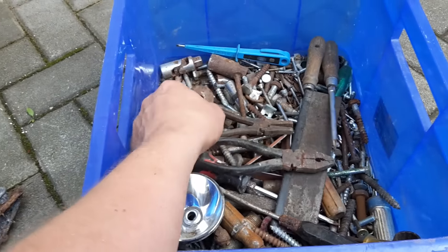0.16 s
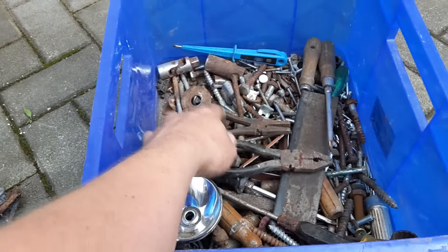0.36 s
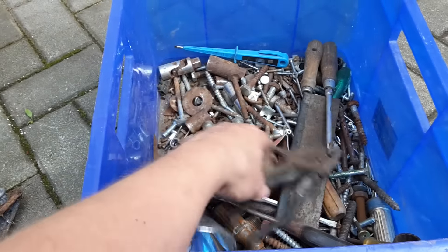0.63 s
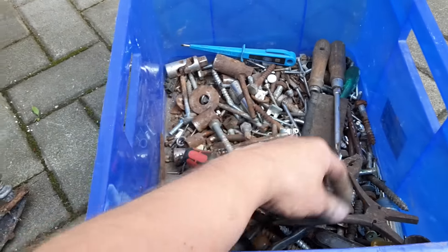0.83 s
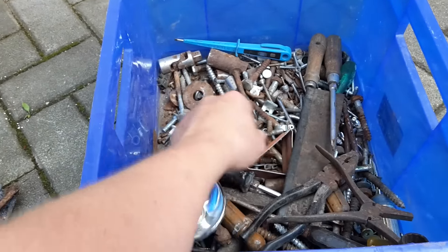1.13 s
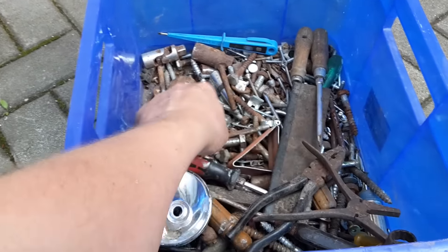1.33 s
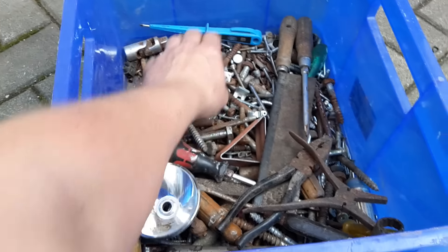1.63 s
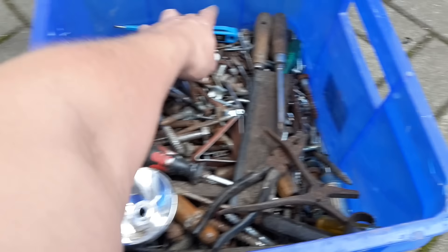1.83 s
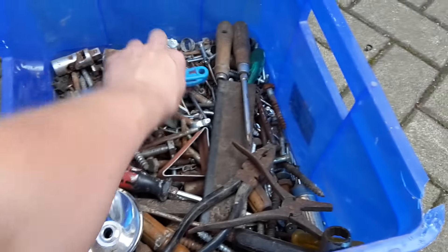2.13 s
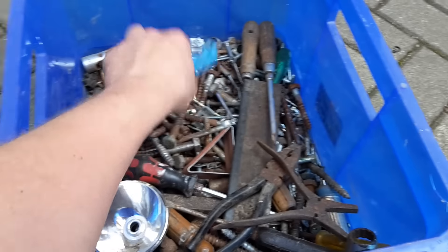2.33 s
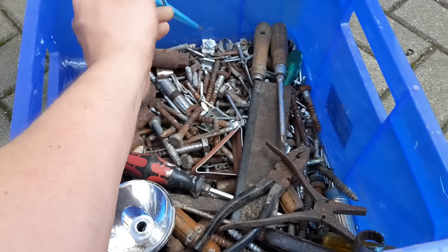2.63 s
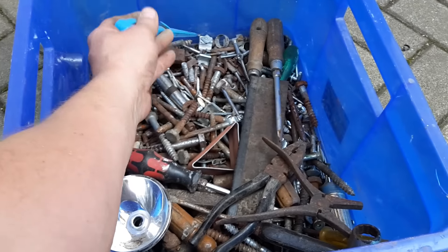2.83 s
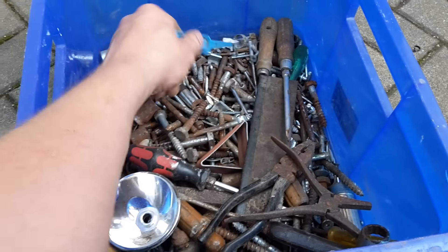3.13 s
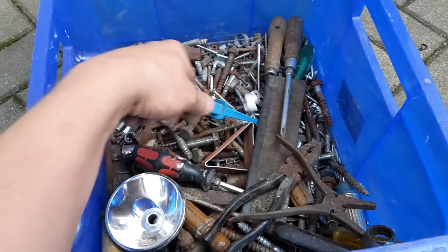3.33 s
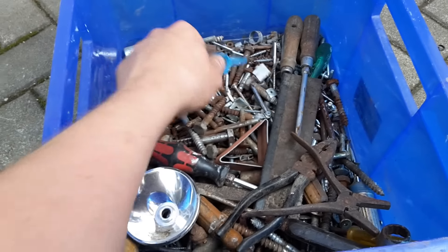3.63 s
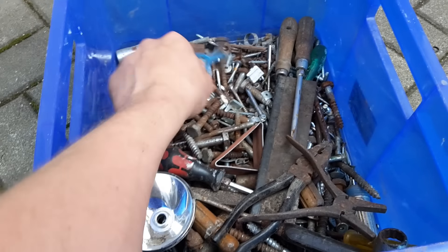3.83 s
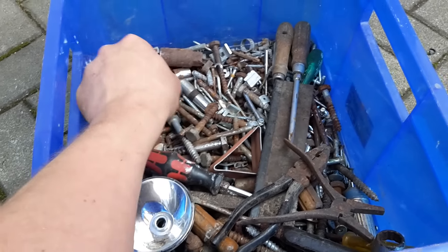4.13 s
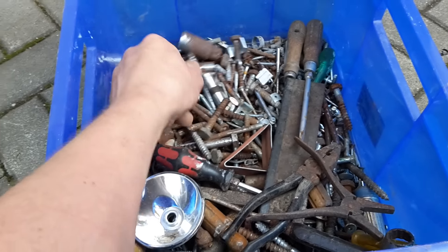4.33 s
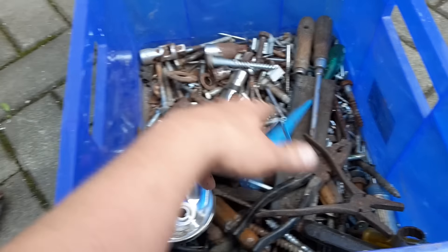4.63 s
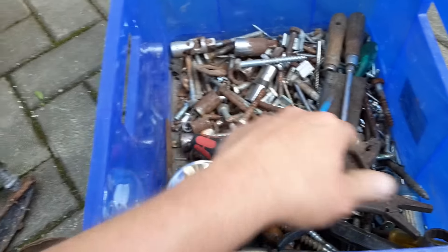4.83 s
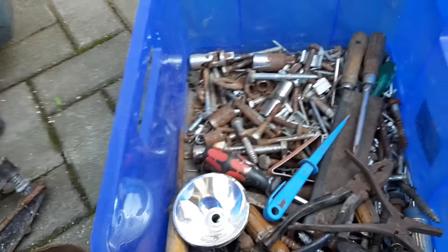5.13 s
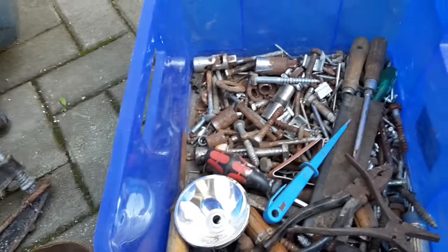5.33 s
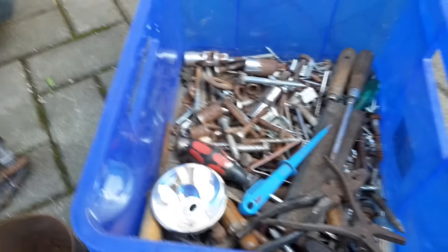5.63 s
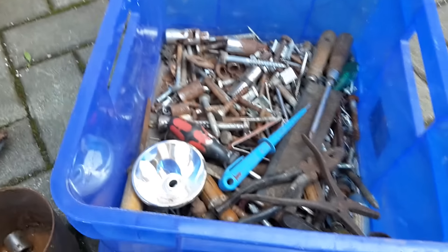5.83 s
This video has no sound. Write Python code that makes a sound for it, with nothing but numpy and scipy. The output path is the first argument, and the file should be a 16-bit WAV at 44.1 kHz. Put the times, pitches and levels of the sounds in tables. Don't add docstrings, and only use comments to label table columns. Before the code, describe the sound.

A close, bright stereo pickup over a plastic crate of steel screws and hand tools in a paved yard. A low rumble and faint hum sit far behind, swelling and fading slightly. From 0.15 s pliers clink, with a short scrape at 0.2; clanks and wooden knocks crowd 0.55-1.05, peaking in a hard, dull thud near 0.87. Small bounces fade after 1.1, leaving near quiet with a tiny tick at 1.45. A low thump at 1.9 leads into dense, glittering raking of screws at 2.05-2.45 and a clink at 2.54. Soft thuds come at 2.9, light clinks at 3.2, then another sharp jingling burst at 3.33-3.57. Separate clinks follow, strongest at 4.0. From 4.35 screws rattle again, with a clack at 4.7; a plastic pick drops at 4.82 and bounces at 4.92. After 5.1 only faint ticks, hum and thin, distant bird whistles remain.

```python
import sys
import numpy as np
from scipy import signal
from scipy.fft import rfft, irfft, next_fast_len
from scipy.io import wavfile
from scipy.ndimage import uniform_filter1d

SR = 44100
rng = np.random.default_rng(int(sys.argv[2]) if len(sys.argv) > 2 else 0)


def int16_out(signal):
    q = np.round(np.clip(np.atleast_2d(signal).T, -1, 1) * 32767)
    wavfile.write(sys.argv[1], SR, q.astype(np.int16))


def voltage_ratio(level):
    return 10 ** (np.asarray(level, float) / 20)


N = 263277


def evened(x):
    return x / np.sqrt(np.mean(x ** 2) + 1e-20)


def read(points, hz):
    f, value = np.transpose(points)
    return np.interp(np.log(hz + 1), np.log(f + 1), value)


def curve(rows):
    s, *columns = np.transpose(rows)
    return [np.interp(np.arange(N) / SR, s, column) for column in columns]


def drift(*sizes):
    x = rng.standard_normal(N)
    for size in sizes:
        x = uniform_filter1d(x, size=size)
    return evened(x)


def add(mix, s, sound):
    part = mix[:, round(s * SR):][:, :sound.shape[1]]
    part += sound[:, :part.shape[1]]


def highpass(x, order, hz):
    return signal.sosfilt(signal.butter(order, hz, "high", fs=SR, output="sos"), x)


def colour(x, spectrum):
    hz = abs(np.fft.fftfreq(4096, 1 / SR))
    log_gain = np.log(voltage_ratio(np.maximum(read(spectrum, hz), -90)))
    taps = np.fft.ifft(np.exp(np.conj(signal.hilbert(log_gain)))).real[:2048]
    return signal.oaconvolve(x, taps[None] / np.linalg.norm(taps), axes=1)[:, :N]


# (frequency [Hz], likeness [0-1])
LIKENESS = [(60, 0.89), (300, 0.93), (640, .7), (1400, 0.32), (15000, 0.022)]
# (frequency [Hz], left over right [dB])
BALANCE = [(60, -2), (400, -1.5), (1500, -6), (8000, -9.5), (14000, -0.5)]


def ports(x):
    size = next_fast_len(N)
    hz, z = np.fft.rfftfreq(size, 1 / SR), rfft(x, size)
    same = np.clip(read(LIKENESS, hz), 0, 1)
    lean = voltage_ratio(read(BALANCE, hz) / 2)
    left = lean * z[0]
    right = (same * z[0] + np.sqrt(1 - same ** 2) * z[1]) / lean
    return irfft([left, right], size)[:, :N]


def modes(hz, db, t60, pan_db, turn, rise=0.0012):
    t = np.arange(int(SR * np.clip(np.max(t60), .01, .8))) / SR
    columns = (hz, db, np.maximum(t60, .01), pan_db, turn)
    hz, db, t60, pan_db, turn = (np.reshape(v, (-1, 1)) for v in columns)
    size = voltage_ratio(db - 60 * t / t60) * (1 - np.exp(-t / rise))
    sides = []
    for side in (1, -1):
        sine = np.sin(2 * np.pi * hz * t + side * turn / 2)
        sides.append((size * voltage_ratio(side * pan_db / 2) * sine).sum(0))
    return np.array(sides)


def burst(db, t60):
    t = np.arange(4000) / SR
    rise = 1 - np.exp(-t / .0006)
    return voltage_ratio(db - 60 * t / max(t60, .005)) * rise * rng.standard_normal((2, 4000))


def patchy(x, depth_db):
    z = signal.stft(x, nperseg=256, noverlap=192)[2]
    spots = uniform_filter1d(rng.standard_normal(z.shape[1:]), size=2, axis=0)
    spots = uniform_filter1d(spots, size=14, axis=1)
    gain = voltage_ratio(depth_db * evened(spots))
    return signal.istft(z * evened(gain), nperseg=256, noverlap=192)[1][:, :N]


def whistle(hz, width):
    r = np.exp(-np.pi * width / SR)
    slow = signal.lfilter([1], [1, -r], rng.standard_normal(N) + 1j * rng.standard_normal(N))
    phase = 2 * np.pi * np.cumsum(hz * np.ones(N)) / SR
    return evened(((3.3 + slow / np.std(slow)) * np.exp(1j * phase)).real)


# (time [s], level [dB])
YARD_LEVEL_DB = [(0, -63), (0.3, -50.5), (0.5, -53), (1.2, -49.5), (1.88, -45), (2.0, -30.5), (2.1, -37),
                 (2.5, -47), (3.55, -52), (3.72, -57.5), (3.95, -48), (4.1, -45), (4.22, -65),
                 (4.32, -59.5), (4.55, -37), (5.05, -47.5), (5.6, -47.5), (5.97, -42)]
# (frequency [Hz], density [dB per Hz])
YARD_SPECTRUM = [(35, -6.5), (150, -7), (300, -10), (650, -20.5), (1750, -41), (3500, -64.5), (8300, -69.5),
                 (16500, -75)]
# (frequency [Hz], width [Hz], level over the yard [dB])
HUM_LINES = [(215.3, 7.1, -3), (194.6, 9, -10), (119, 26, -15), (660, 13, -21.5), (1082, 9, -23)]


def yard():
    level_db = curve(YARD_LEVEL_DB)[0] - 9.5
    rumble = evened(ports(colour(rng.standard_normal((2, N)), YARD_SPECTRUM)))
    deep = signal.sosfiltfilt(signal.butter(2, 110, fs=SR, output="sos"), rumble)
    hum = sum(voltage_ratio(db) * whistle(hz, width) for hz, width, db in HUM_LINES)
    steady = deep + hum * voltage_ratio([[-.6], [.6]])
    return voltage_ratio(level_db) * (rumble - deep) + voltage_ratio(np.minimum(level_db, -54)) * steady


# (time [s], frequency [Hz], level [dB])
BIRD_WHISTLES = [
    [(5.1, 5900, -81), (5.26, 6240, -77), (5.35, 6580, -103.5), (5.5, 6300, -81), (5.66, 5980, -87)],
    [(5.07, 5340, -99), (5.3, 5370, -90), (5.6, 5030, -88)],
    [(5.78, 4880, -96), (5.84, 4520, -96), (5.96, 4550, -87)],
]


def birds():
    out, t = np.zeros(N), np.arange(N) / SR
    for rows in BIRD_WHISTLES:
        hz, db = curve(rows)
        db = db + 4 * drift(1500) - 3
        warble_hz = 110 * drift(900, 900)
        sounding = (t > rows[0][0]) * (t < rows[-1][0])
        out += voltage_ratio(db) * whistle(hz + warble_hz, 90) * sounding
    return out * voltage_ratio([[-4.5], [-1.5]])


# (frequency [Hz], density [dB per Hz])
CRATE_SPECTRUM = [(60, -46), (250, 5), (600, -7), (1200, 2.5), (2500, -8), (3700, -31), (6000, -45)]


def blows(rows, others, turn, puff_db, pan_db, rise, dull_db):
    tones, puffs = np.zeros((2, N)), np.zeros((2, N))
    rank = np.arange(len(others) + 1) > 0
    for (s, db, hz, t60), luck in zip(rows, rng.uniform(-1.5, 1, (len(rows), 3, len(rank)))):
        near = hz * np.r_[1, others] * (1 + 0.052 * rank * luck[0])
        dulling = dull_db * np.maximum(np.log2(near / hz), 0)
        level = db + 5.5 - 7 * rank + 3 * luck[1] * rank - dulling
        add(tones, s, modes(near, level, t60 * (1 - 0.26 * rank), pan_db + 0 * near, turn * luck[2], rise))
        add(puffs, s, burst(db + puff_db, 2.0 * t60))
    return tones + ports(colour(puffs, CRATE_SPECTRUM))


# (time [s], peak level [dB], frequency [Hz], t60 [s])
FLOOR_THUDS = [(0.142, -33.5, 233, .07), (0.17, -33, 253, .07), (0.627, -42, 263, .07),
               (0.865, -16.5, 440, .035), (.874, -24, 520, .05), (.896, -31, 400, .04),
               (1.909, -23.5, 182.6, .06), (1.909, -44, 554, .2), (1.986, -33.5, 288, .07),
               (2.023, -26.5, 280, .07), (2.146, -34.5, 292, .07), (2.31, -30.5, 303, .07),
               (2.899, -31, 285, .1), (2.933, -30.5, 275, .05), (2.95, -40, 290, .05),
               (3.189, -33.5, 239, .07), (3.962, -37, 230, .07), (3.973, -29, 260, .09),
               (4.06, -42, 250, .12), (4.425, -42, 362, .07), (4.49, -36, 285, .07), (4.507, -25, 214, .05),
               (4.542, -33, 300, .15), (4.725, -22.5, 301, .03), (4.794, -36.5, 275, .07)]


def thuds():
    late = [(s + 0.0021, *rest) for s, *rest in FLOOR_THUDS]
    out = blows(late, others=[.55, .8, 1.3, 1.9], turn=0.34, puff_db=-25.5, pan_db=-2.0,
                rise=0.0022, dull_db=8)
    return highpass(out, 2, 110)


# (frequency [Hz], density [dB per Hz])
STEEL_SPECTRUM = [(3000, -11.5), (3690, -32), (4260, -23), (7110, -44), (9660, 4), (12100, 1),
                  (15300, -9.5), (16500, -28.5)]
# (frequency [Hz], density [dB per Hz])
PLIERS_SPECTRUM = [(2500, -14), (3500, -2.5), (5100, -6.5), (6000, 3.5), (8000, 4.5), (9500, -27.5)]


def grains(per_s, size_db, tail_s, busy):
    ticks = (rng.random(N) < per_s / SR) * voltage_ratio(size_db * np.minimum(rng.exponential(1, N), 3))
    keep = np.exp(-1 / (tail_s * SR))
    contacts = evened(signal.lfilter([1], [1, -keep], ticks))
    level = (1 + busy * contacts) / np.sqrt(1 + busy + busy ** 2)
    return level * rng.standard_normal((2, N))


def jingle(busy):
    out = np.zeros((2, N))
    for s, size, *luck in rng.random((2000, 11)):
        if busy[int(s * N)] > 0:
            f, pan, turn = np.reshape(luck, (3, 3))
            hz = 3000 + 12800 * f
            db = 0.47 * read(STEEL_SPECTRUM, hz) + 14 * size
            add(out, s * N / SR, modes(hz, db, .012 + .07 * turn ** 2, 14 * pan - 9, 2 * np.pi * turn))
    return out / np.sqrt(np.mean(out[:, busy > 0] ** 2))


# (start [s], end [s], screws at start [dB], screws at end [dB], crate wall [dB])
HAND_STROKES = [(0.173, 0.247, -37.5, -36.5, -51), (0.559, 0.817, -53.5, -48.5, -56.5),
                (0.8, 0.912, -51.5, -37, -50), (0.978, 1.065, -49, -59, -61.5),
                (1.987, 2.048, -59, -59.5, -60), (2.119, 2.408, -38, -32.5, -48),
                (2.716, 2.773, -59.5, -60, -86), (3.203, 3.328, -61, -52, -62),
                (3.327, 3.479, -34, -36.5, -60), (3.876, 4.002, -55, -42, -54),
                (4.359, 4.51, -52.5, -51.5, -56), (4.515, 4.563, -38, -34, -42.5),
                (4.612, 4.96, -48.5, -51.5, -56.5), (5.0, 5.722, -61.5, -70.5, -83),
                (5.84, 5.99, -72, -55, -78)]
RISE_DB_PER_S, SCREWS_FALL_DB_PER_S, WALL_FALL_DB_PER_S = 1397, 331.5, 151.5
REST_SCREWS_DB, REST_WALL_DB, REST_FOLLOW = -80.5, -85.5, 2.4


def heap_levels():
    t = np.arange(N) / SR
    rest = np.minimum(curve(YARD_LEVEL_DB)[0] + 57, 0)
    screws, wall = REST_SCREWS_DB + REST_FOLLOW * rest, REST_WALL_DB + rest
    for start, end, first_db, last_db, wall_db in HAND_STROKES:
        before = RISE_DB_PER_S * np.maximum(start - t, 0)
        after = np.maximum(t - end, 0)
        stroke = np.interp(t, [start, end], [first_db, last_db])
        screws = np.maximum(screws, stroke - before - SCREWS_FALL_DB_PER_S * after)
        wall = np.maximum(wall, wall_db - before - WALL_FALL_DB_PER_S * after)
    return screws, wall


def stir():
    screws_db, wall_db = heap_levels()
    busy = np.clip((screws_db + 62) / 12, 0, 1.5)
    screw_grains = patchy(grains(300, 4.5, .002, busy), depth_db=4) / np.sqrt(1 + busy)
    wall_grains = grains(260, 4.0, .003, .2 + busy)
    heavy = .06 * busy * colour(screw_grains[::-1], PLIERS_SPECTRUM)
    screws = ports(colour(screw_grains, STEEL_SPECTRUM) + heavy)
    screws = screws + .6 * np.minimum(busy, 1) * jingle(busy)
    screws_db = screws_db + 3 * drift(1500, 1500)
    wall = ports(colour(wall_grains, CRATE_SPECTRUM))
    return voltage_ratio(screws_db + 0.5) * screws + voltage_ratio(wall_db + 5.0) * wall


def struck(tables, main_hz, spread):
    rows = [(*row, hz) for table, hz in zip(tables, main_hz) for row in table]
    luck = rng.uniform(-1.6, 1, len(rows))
    return [(*row[:-1], row[-1] * (1 + spread * u)) for row, u in zip(rows, luck)]


# (time [s], peak level [dB])
WALL_KNOCKS = [(.634, -31), (.823, -31.5), (.851, -35), (.927, -31), (1.438, -56), (2.936, -38),
               (4.69, -38), (.981, -36.5), (1.008, -28), (1.143, -39.5), (1.183, -47), (1.274, -46.5),
               (1.566, -51.5), (1.704, -52), (1.817, -50.5), (2.903, -38.5), (3.19, -36.5), (3.331, -32.5),
               (3.909, -39), (4.378, -35.5), (4.759, -30), (5.077, -38.5), (5.159, -41.5), (3.212, -37)]
THICK_HANDLE_KNOCKS = [(0.864, -25), (.9495, -25), (1.0255, -24), (1.0475, -30), (1.111, -35), (2.157, -32)]
HANDLE_KNOCKS = [(0.149, -42), (.168, -29.5), (0.248, -35), (.619, -32), (.657, -33.5), (.716, -29.5),
                 (2.054, -25.5), (2.094, -31.5), (2.544, -42.5), (2.937, -36.5), (3.646, -38), (3.998, -43),
                 (4.549, -28), (4.822, -25), (4.918, -29.5)]
THIN_HANDLE_KNOCKS = [(.595, -35.5), (.8675, -20), (4.535, -33), (.758, -26.5), (1.454, -45.5)]
GRIP_KNOCKS = [(0.554, -40.5), (.869, -24), (0.884, -25), (3.39, -33), (3.41, -34), (2.545, -38),
               (.901, -31), (2.287, -27), (3.373, -32.5), (3.438, -30), (3.876, -43), (4.69, -37.5)]


def knocks():
    tables = [WALL_KNOCKS, THICK_HANDLE_KNOCKS, HANDLE_KNOCKS, THIN_HANDLE_KNOCKS, GRIP_KNOCKS]
    rows = struck(tables, main_hz=[1047, 1175, 1360, 1430, 2080], spread=0.075)
    t60_s = .019
    return blows([(*row, t60_s) for row in rows], others=[.7, .85, 1.2, 1.45, 1.8], turn=1.74,
                 puff_db=-8.5, pan_db=-5, rise=0.0012, dull_db=4)


# (time [s], level [dB])
PICK_BOUNCES = [
    (4.821, -26),
    (4.867, -36),
    (4.919, -28),
    (4.974, -40.5),
    (5.077, -51),
    (5.096, -50),
]
# (frequency [Hz], level [dB], t60 [s])
PICK_BODY = [(1450, -4, 0.04), (2040, -7, .03), (3400, -8, .025), (2400, -4, .04), (2870, -1, 0.05),
             (3970, -7, 0.016), (4635, -5, 0.033)]


def pick():
    out, (hz, mode_db, t60) = np.zeros((2, N)), np.transpose(PICK_BODY)
    for (s, db), luck in zip(PICK_BOUNCES, rng.uniform(-1, 1, (len(PICK_BOUNCES), len(hz)))):
        spot = luck[::-1]
        level = db + mode_db + 5 * luck
        add(out, s, modes(hz * (1 + .035 * spot), level, .55 * t60, -7 + 0 * hz, 1.5 * spot))
    return out


# (time [s], level [dB],
# frequency [Hz], t60 [s], left over right [dB])
SINGLE_RINGS = [(0.147, -42, 10980, 0.2, 0), (0.171, -40, 11010, 0.3, -3), (.708, -42, 10920, .2, -3),
                (.852, -32, 10950, .1, -5), (.884, -34, 10200, .11, -5), (.87, -40, 9738, .4, -8),
                (.953, -32, 11580, .1, 0), (.952, -38, 8376, .05, -8), (.884, -39, 3047, .12, -6),
                (.866, -31, 2750, .025, -6), (.868, -33, 3400, .025, -4), (.899, -39, 2650, .05, -7),
                (1.457, -80, 4996, .2, -6), (1.457, -68, 8140, .2, -8), (1.457, -66, 6794, .07, -6),
                (0.231, -30.5, 9670.0, 0.075, -20.5), (0.554, -50, 11020, 0.22, -11),
                (0.885, -44.5, 7430, 0.13, -19), (1.458, -58.5, 12700, 0.11, -2),
                (1.456, -64, 14770, 0.32, -17), (2.143, -22, 10980, 0.12, -8), (2.215, -28, 13100, 0.07, 5),
                (2.268, -27, 10980, .12, -3), (2.28, -39, 4318, 0.21, 5.5), (2.384, -43, 14740, 0.35, -9),
                (2.445, -55, 4950, 0.1, -9.5), (3.329, -36, 12860, 0.2, 8), (3.438, -34, 12520, 0.19, 12),
                (3.565, -61.5, 8530, 0.46, -11), (3.623, -50, 12250, 0.09, 7),
                (3.995, -45, 8134, 0.16, -16.5), (4.005, -42, 15150.0, 0.25, 0.5), (4.08, -53, 12260, .2, 0),
                (3.79, -60, 8530, .1, -11), (4.8, -48, 8330, .07, -9), (4.328, -52, 13320, 0.2, 0),
                (4.356, -50, 13320, 0.14, 5), (4.363, -59, 5300, .55, -11), (4.365, -62, 5390, .4, -8),
                (4.622, -56.5, 2750, 0.47, -7), (4.619, -42.5, 8300, 0.28, -17.5),
                (4.919, -33.5, 11200, 0.2, -1)]


def rings():
    out = np.zeros((2, N))
    for (s, db, hz, t60, pan), turn in zip(SINGLE_RINGS, rng.uniform(0.4, 0.7, len(SINGLE_RINGS))):
        add(out, s, modes(hz, db + 2.0, t60, pan, turn, rise=0.00078))
    return out


# (time [s], level [dB], t60 [s], main mode [Hz], left over right [dB])
PLIERS_CLINKS = [(0.1454, -38.0, 0.14, 11010, 0.2), (0.17, -25.0, 0.1, 11010, -3.8),
                 (0.179, -27, 0.03, 11010, -3), (0.2034, -27.5, 0.037, 10970, -3.1),
                 (0.2337, -25.5, 0.01, 9670, -14.1), (0.2492, -15.0, 0.027, 11040, -0.5),
                 (0.46, -62, 0.06, 10500, -4), (0.5553, -40.0, 0.06, 11020, -14.5),
                 (0.578, -36.0, 0.039, 10970, -4.1), (0.6035, -25.0, 0.02, 11090, -5.0),
                 (0.622, -30.0, 0.07, 10960, -7.4), (0.6363, -17.0, 0.03, 11150, -2.3),
                 (0.6463, -23.0, 0.07, 10370, -6.6), (0.662, -25.0, 0.04, 10350, -5.6),
                 (0.708, -31.5, 0.088, 10920, -3.3), (0.7583, -33.0, 0.13, 10370, -6.4),
                 (0.7992, -33.0, 0.06, 10430, -3.6), (0.8245, -24.5, 0.041, 11880, -2.3),
                 (0.8512, -21.0, 0.12, 10950, -5.3), (0.871, -27, 0.05, 11000, -4),
                 (0.8827, -24.0, 0.11, 10190, -5.1), (0.9516, -24.0, 0.06, 11600, 0.2),
                 (0.984, -38.0, 0.04, 11620, -2.2), (1.0112, -29.0, 0.035, 9290, -12.8),
                 (1.026, -24.0, 0.044, 9220, -10.2), (1.048, -36.0, 0.05, 10580, -4.5),
                 (1.274, -62, 0.05, 10500, -4), (1.4538, -49.5, 0.066, 12630, -2.2)]
RAKE_CLINKS = [(2.0059, -37.5, 0.087, 10760, -7.4), (2.0545, -28.0, 0.04, 10660, -1.1),
               (2.0955, -10.0, 0.046, 11480, 2.4), (2.1295, -22.0, 0.05, 10960, -1.4),
               (2.1441, -17.0, 0.06, 10980, -5.3), (2.1613, -18.0, 0.045, 10970, -4.5),
               (2.173, -19.0, 0.03, 10980, -2.3), (2.1967, -18.0, 0.015, 12400, -1.6),
               (2.2157, -12.0, 0.04, 13080, 5.1), (2.2293, -15.0, 0.04, 13080, -0.8),
               (2.2365, -15.0, 0.05, 13090, -2.1), (2.2658, -18.0, 0.04, 11000, -3.7),
               (2.287, -11.0, 0.04, 10970, -2.5), (2.3096, -10.0, 0.05, 11800, 2.9),
               (2.3225, -15.0, 0.035, 11800, -0.8), (2.336, -21.0, 0.05, 15340, -3.9),
               (2.3612, -17.0, 0.03, 10940, -2.4), (2.377, -23.0, 0.03, 11050, -2.1),
               (2.385, -20.0, 0.06, 10970, 0.2), (2.4065, -21.0, 0.05, 11750, 6.4),
               (2.45, -33.5, 0.12, 14740, 1.2), (2.5435, -14.0, 0.072, 11580, -2.3),
               (2.9013, -47.0, 0.075, 10840, -2.9), (3.1854, -26.0, 0.07, 11270, 0.1),
               (3.198, -32.0, 0.05, 10210, -4.6), (3.217, -38.0, 0.05, 9800, -1.9),
               (3.2452, -45.0, 0.05, 10220, -5.9), (3.2766, -42.0, 0.04, 11350, -3.6),
               (3.3263, -34.0, 0.1, 12880, 0.5), (3.357, -28.0, 0.04, 14010, -5.3),
               (3.3702, -10.0, 0.04, 12630, -0.9), (3.3904, -15.0, 0.07, 12520, -1.4),
               (3.4087, -15.0, 0.031, 10540, -2.5), (3.427, -25.0, 0.03, 11660, 0.8),
               (3.4357, -12.5, 0.027, 12510, -1.4), (3.447, -24.0, 0.07, 12520, 3.5),
               (3.5121, -22.0, 0.04, 12050, -2.8), (3.5325, -16.0, 0.025, 9540, -2.1),
               (3.563, -29.0, 0.032, 9810, -4.1)]
PICK_CLINKS = [(3.6458, -37.0, 0.034, 10060, -5.9), (3.654, -45, 0.03, 12000, -3),
               (3.665, -44, 0.05, 14200, -2), (3.75, -48, 0.03, 9800, -6), (3.772, -47, 0.04, 9800, -6),
               (3.7909, -41.0, 0.027, 10020, -9.0), (3.8106, -29.0, 0.1, 9850, -7.9),
               (3.829, -38, 0.04, 9800, -6), (3.8771, -18.0, 0.026, 9780, -6.0),
               (3.9065, -32.5, 0.09, 10510, -3.7), (3.9627, -28.0, 0.03, 10950, -2.3),
               (3.99, -22, 0.05, 11970, -1.1), (3.9991, -13.0, 0.036, 12140, 0.0),
               (4.026, -24, 0.03, 9750, -6), (4.048, -29.0, 0.068, 13190, -3.8),
               (4.066, -34, 0.02, 10800, -3), (4.3264, -34.0, 0.026, 13320, -3.4),
               (4.347, -32.0, 0.03, 9520, -1.8), (4.3557, -35.0, 0.04, 11970, 0.5),
               (4.3625, -28.0, 0.025, 9940, -3.4), (4.4545, -32.0, 0.047, 9820, -6.4),
               (4.4906, -31.0, 0.1, 9770, -3.7), (4.509, -26.0, 0.038, 11800, -0.1),
               (4.5289, -17.0, 0.051, 9660, -6.4), (4.5474, -21.0, 0.067, 11410, -0.1),
               (4.5847, -28.0, 0.05, 9790, -9.1), (4.6895, -26.0, 0.028, 10840, -2.0),
               (4.6997, -11.5, 0.063, 10710, -4.0), (4.7281, -15.0, 0.022, 10680, -4.0),
               (4.76, -21.0, 0.025, 11100, 1.7), (4.8, -27.0, 0.015, 8330, -5.1),
               (4.8223, -13.5, 0.06, 10210, -5.9), (4.8664, -36.5, 0.06, 10730, -2.7),
               (4.9185, -16.5, 0.052, 10330, -7.1), (5.231, -54.0, 0.39, 10090, -6.5),
               (5.378, -51.0, 0.11, 10070, -4.9), (5.53, -54.0, 0.1, 12490, -1.5),
               (5.7, -48.5, 0.032, 10210, -4.2)]
# (first time [s], peak level [dB], gap [s], loss a bounce [dB])
BOLT_BOUNCES = [
    (0.3415, -54.5, .043, 2.5),
    (1.110, -48, 0.037, 3),
]
BOUNCE_T60_S = 0.075
# (time [s], level [dB])
PLIERS_LEVEL_DB = [(.3, -13), (.5, -7.5), (.62, -5.5), (.9, -10), (1.2, -16), (1.3, -22), (5.97, -24.5)]


def clinks():
    tones, cracks = np.zeros((2, N)), np.zeros((2, N))
    bounces = [(s + k * gap, db - k * loss_db, BOUNCE_T60_S, 10300, -5)
               for s, db, gap, loss_db in BOLT_BOUNCES for k in range(3)]
    rows = PLIERS_CLINKS + RAKE_CLINKS + PICK_CLINKS + bounces
    for (s, db, t60, hz, pan_db), luck in zip(rows, rng.random((len(rows), 4, 16))):
        mode_hz = np.r_[hz, hz - 900 + 1800 * luck[0, 1], 3200 + 12600 * luck[0, 2:]]
        weak_db = -5 + .85 * read(STEEL_SPECTRUM, mode_hz[2:]) - 10 * luck[1, 2:]
        level = db + np.r_[-5, -8, weak_db]
        mode_t60 = t60 * np.r_[.9, .25 + .5 * luck[2, 1:] ** 2]
        mode_pan = pan_db + 8 * luck[1, ::-1] - 4
        add(tones, s, modes(mode_hz, level, mode_t60, mode_pan, 2 * np.pi * luck[3], rise=0.0006))
        add(cracks, s, burst(db - 5.5, .75 * t60) * voltage_ratio([[pan_db / 2 + 2], [-pan_db / 2 - 2]]))
    cracks = patchy(cracks, depth_db=5.5)
    heavy = voltage_ratio(curve(PLIERS_LEVEL_DB)[0]) * colour(cracks, PLIERS_SPECTRUM)
    return tones + ports(colour(cracks, STEEL_SPECTRUM) + heavy)


def crate_echo(x):
    t = np.arange(6000) / SR
    echoes = rng.choice([-1., 1.], (2, 6000)) * (rng.random((2, 6000)) < .06)
    taps = echoes * voltage_ratio(-60 * t / 0.17) * (t > .001)
    return signal.oaconvolve(x, taps / np.linalg.norm(taps[0]), axes=1)[:, :N]


def scene():
    background = yard() + birds()
    heap = thuds() + stir() + rings()
    hits = knocks() + pick() + highpass(clinks(), 2, 350)
    return background + heap + hits + voltage_ratio(-9) * crate_echo(hits)


def top_cut(x):
    return signal.sosfilt(signal.butter(12, 16970, fs=SR, output="sos"), x)


def record(dry):
    mix = highpass(dry, 4, 48)
    mix = signal.sosfilt(signal.butter(14, 16100, fs=SR, output="sos"), mix)
    return top_cut(mix)


dry = scene()
out = record(dry)
int16_out(out)
```